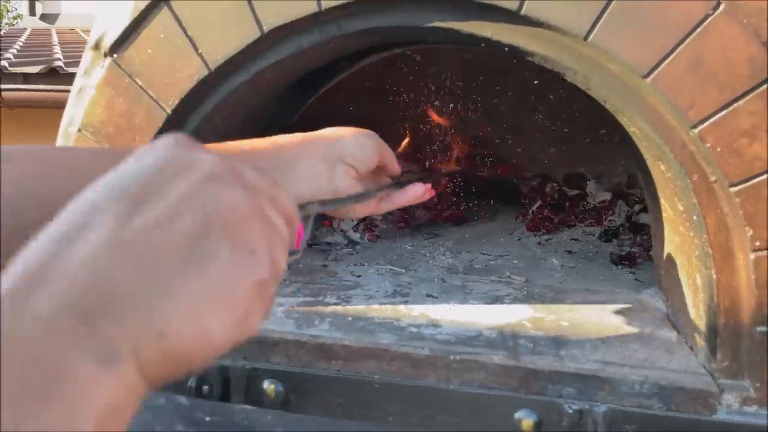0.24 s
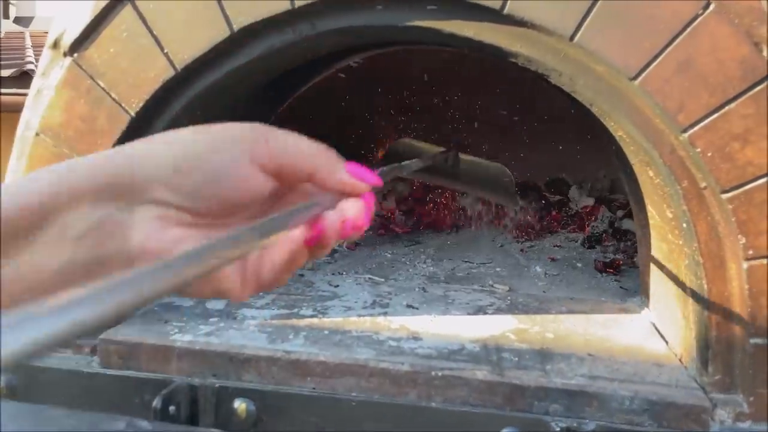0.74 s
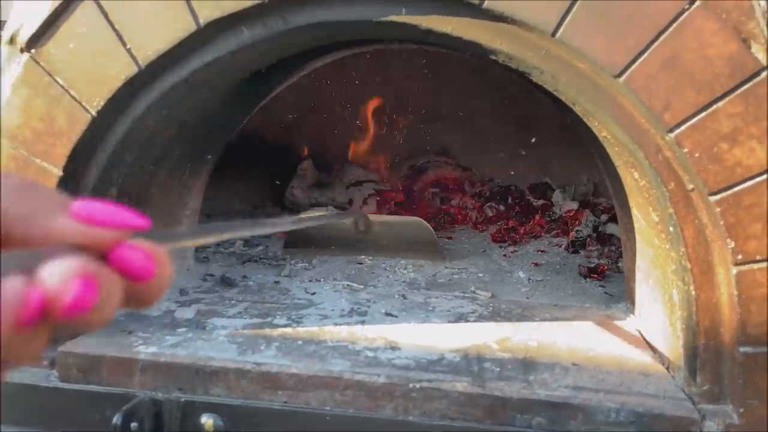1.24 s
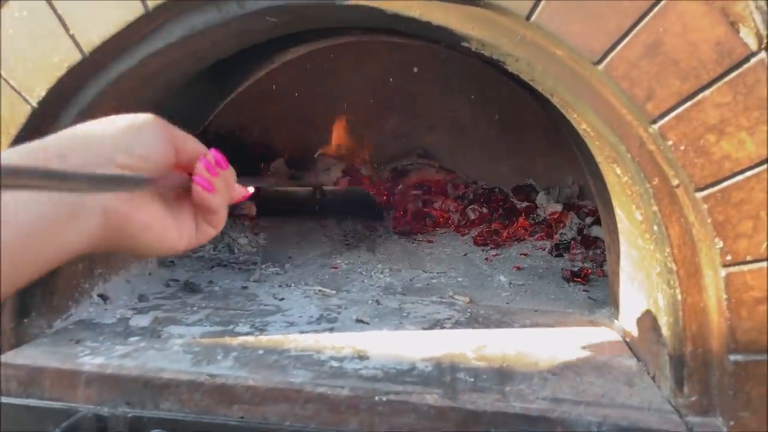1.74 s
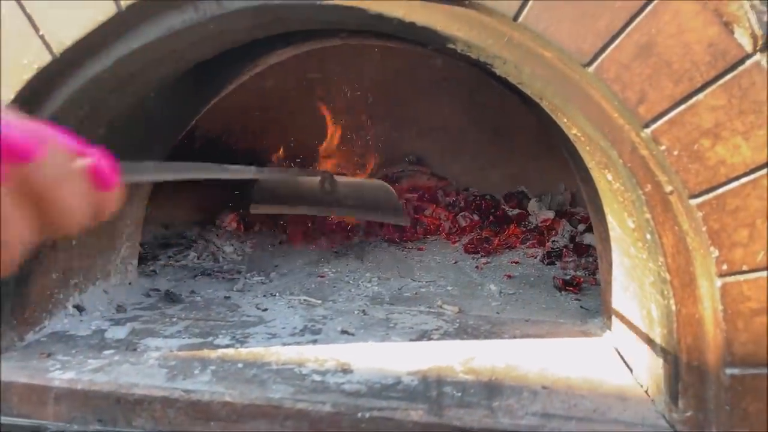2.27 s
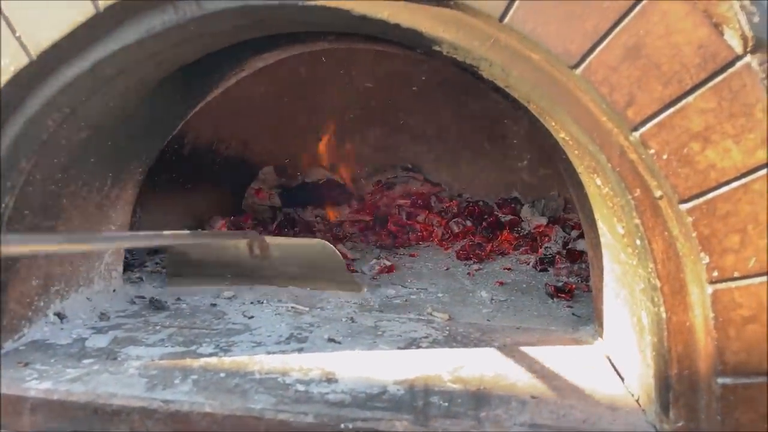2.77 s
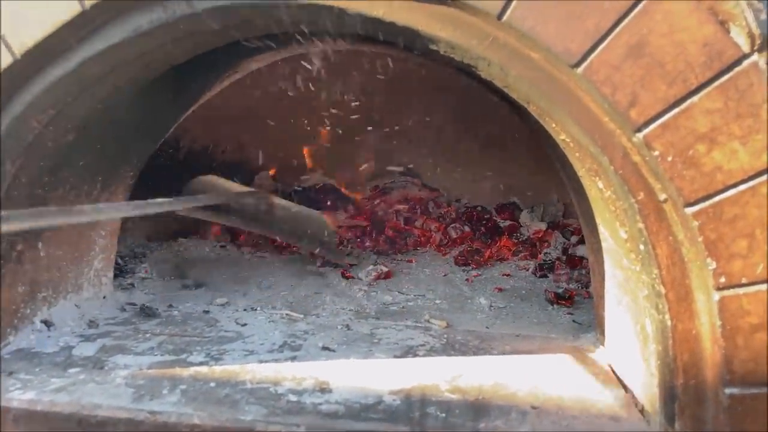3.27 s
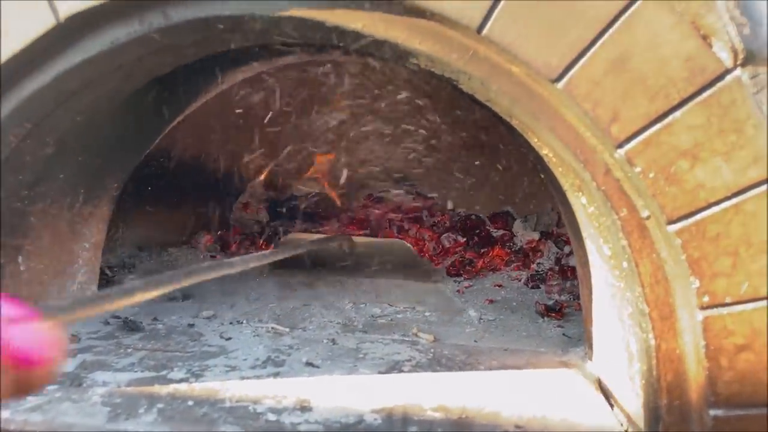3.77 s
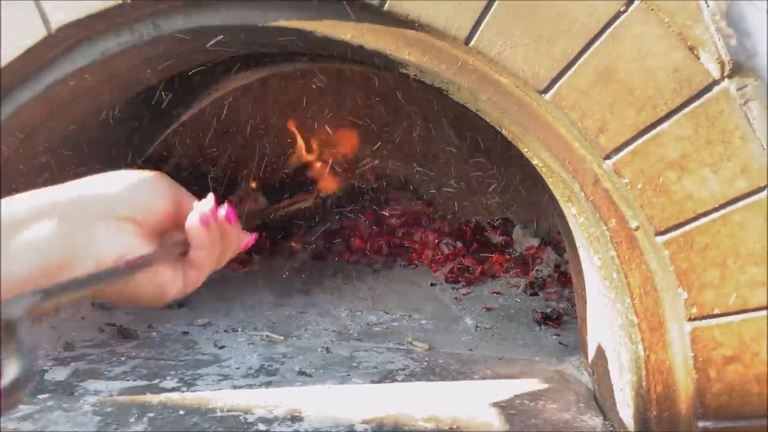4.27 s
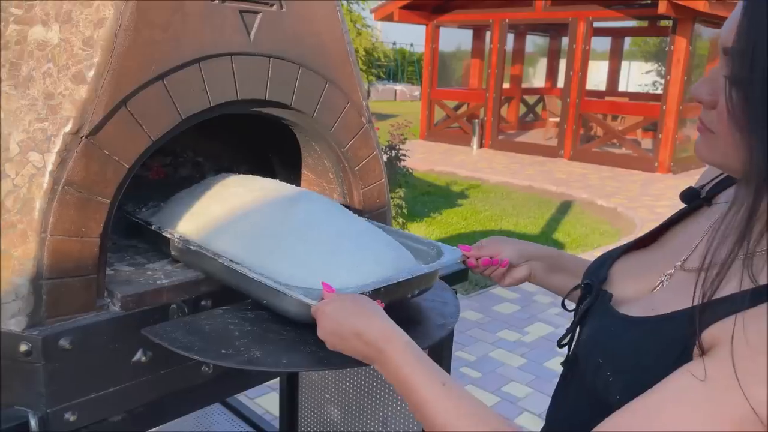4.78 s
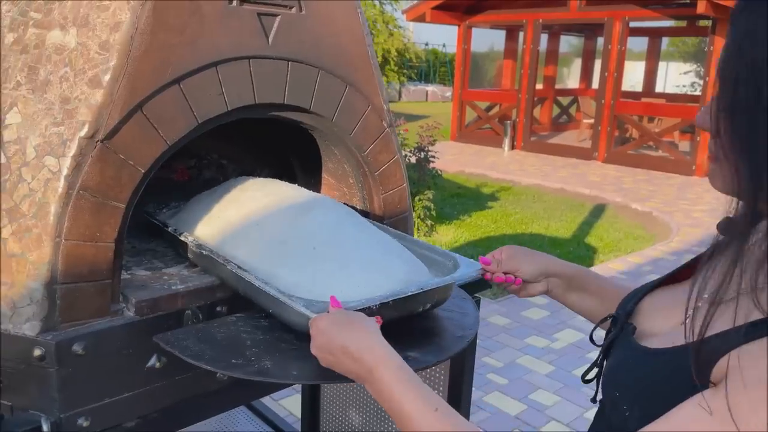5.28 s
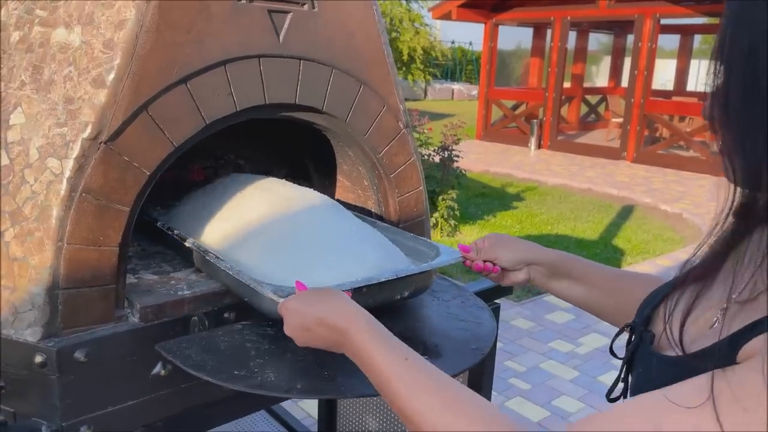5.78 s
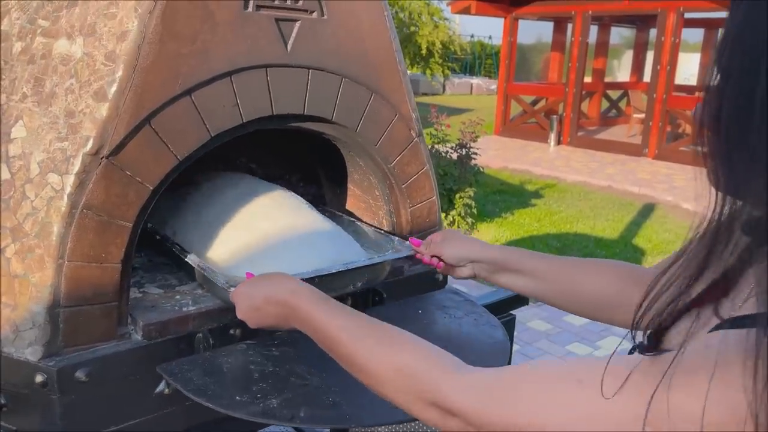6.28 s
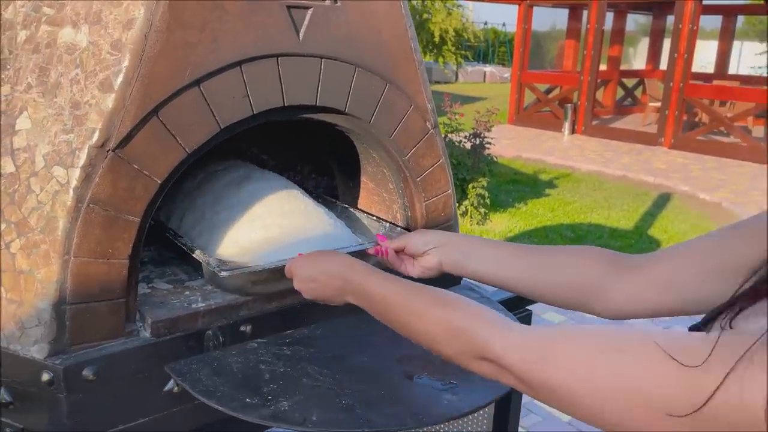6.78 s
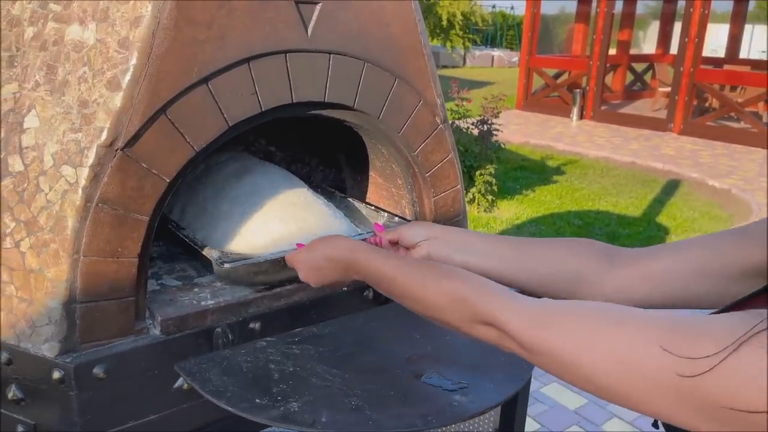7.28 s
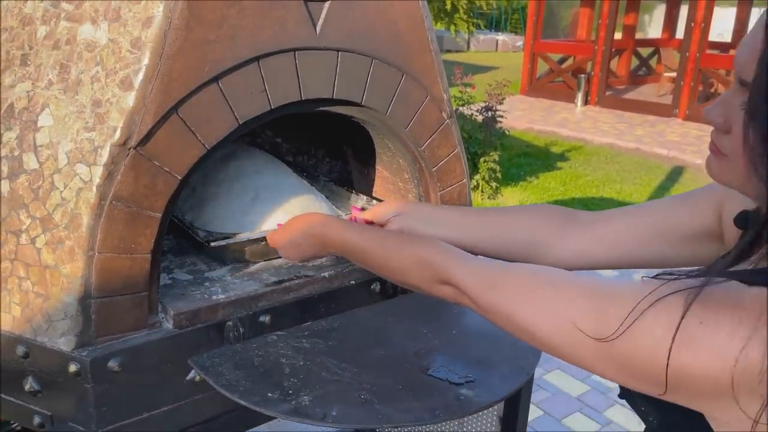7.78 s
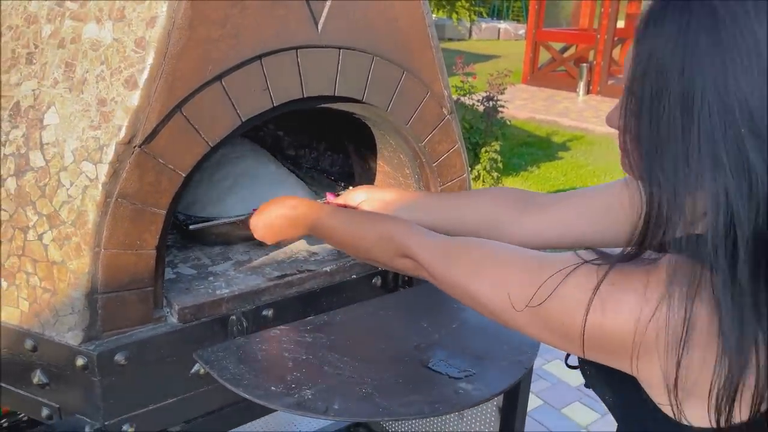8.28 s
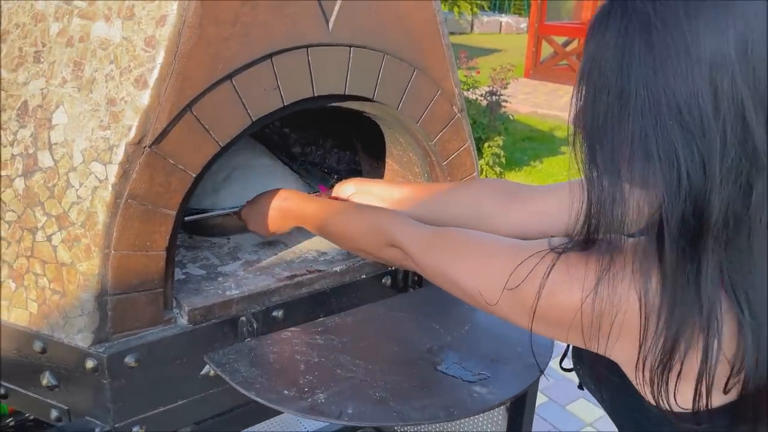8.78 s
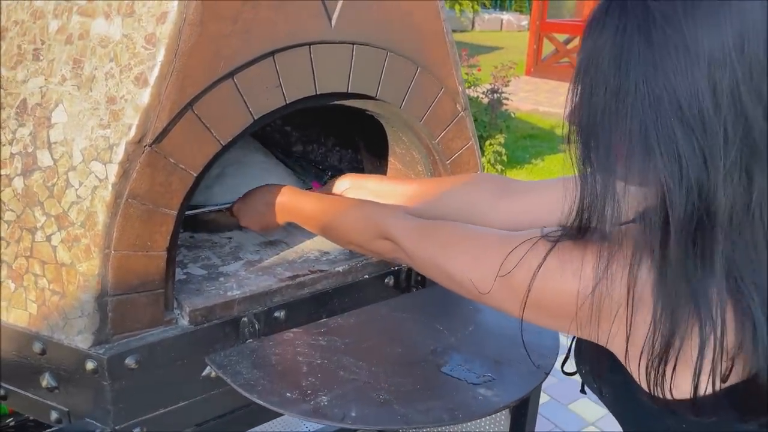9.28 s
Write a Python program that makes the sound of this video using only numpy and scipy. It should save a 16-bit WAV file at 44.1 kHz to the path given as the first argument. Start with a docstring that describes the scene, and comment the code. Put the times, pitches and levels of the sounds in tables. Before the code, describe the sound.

Raking first: bright metallic scrapes, sharp blade taps and brief squeals over stone, mixed with brittle coal clicks and crumbling, in uneven bursts with near-quiet gaps. Next, a heavy pan knocks on metal, its damped sheet ringing briefly, then slides with a rough growl up to a hard clack. After a short pause it scrapes on over sandy stone, crackling with crushed grit. Close, dry microphone, tiny brick-dome reflection, low oven hum and soft outdoor air.

```python
"""Ember rake and baking pan in a wood-fired oven

A long steel rake strikes and scrapes the stone floor: friction and blows drive its modes and charcoal clicks.
Then a loaded metal pan knocks on a steel shelf, ringing in damped sheet modes, slides over it and is pushed
across the gritty hearth as shaped friction noise with bursting grit. The brick dome adds a brief echo of
decaying noise, the cavity hums as noise through a low resonance, and a faint garden hush lies behind."""
import sys
import numpy as np
from scipy import signal
from scipy.fft import rfft, irfft, next_fast_len
from scipy.io import wavfile
from scipy.ndimage import uniform_filter1d, map_coordinates

SR = 44100
rng = np.random.default_rng(int(sys.argv[2]) if len(sys.argv) > 2 else 0)


def write(x):
    x = np.atleast_2d(x).T
    wavfile.write(sys.argv[1], SR, np.round(np.clip(x, -1, 1) * 32767).astype(np.int16))


N = 420273

# The blade hits stone. Each row: start in seconds, level in dB, chatter t60 in seconds, pitch that the
# contact favours in Hz, edge sizzle and floor thump in dB relative to the level.
BLADE_BLOWS = [(0.051, -23, 0.059, 1740, -19, -20), (0.109, -27, 0.12, 5440, -14, -37.5),
               (0.233, -18, 0.046, 1990, -8, -45), (1.258, -27.5, 0.18, 1480, -43, -62),
               (1.304, -22.5, 0.07, 1670, -20, -24), (1.371, -27.5, 0.026, 3400, -5, -46),
               (2.752, -26.5, 0.1, 3440, -30, -26.5), (2.774, -22, 0.09, 2380, -15, -28.5),
               (3.228, -68, 0.05, 700, -12, 12.5), (3.649, -16.5, 0.033, 3100, -11.5, -30),
               (3.657, -15, 0.097, 4100, -2.5, -19), (4.187, -31, 0.035, 3570, -12, -39),
               (4.398, -26.5, 0.049, 1720, -1, -31)]
# How hard the pan is pushed over the shelf, then the hearth.
# Each row: time in seconds, push in dB, level of the hiss in dB, both before the mix of the slide.
SHELF_PUSH = [(5.42, -65, -70), (5.528, -51.5, -69), (5.666, -58, -66), (5.738, -46.5, -66.5),
              (6.108, -40.5, -49), (6.336, -38.5, -48.5), (6.484, -34, -44), (6.54, -32, -42),
              (6.666, -42, -48.5), (6.78, -74.5, -82)]
HEARTH_PUSH = [(6.88, -65.5, -73), (6.96, -63, -85), (7.23, -53.5, -62), (7.39, -36.5, -44),
               (7.51, -37.5, -44), (8.27, -35.5, -44), (8.53, -38.5, -42.5), (8.71, -39.5, -45.5),
               (8.99, -40.5, -43.5), (9.15, -44.5, -44.5), (9.53, -40.5, -48)]


def amp(db):
    """Decibels to gain."""
    return np.exp(np.asarray(db) * (np.log(10) / 20))


def unit(x):
    """Scale to rms 1."""
    return x / np.sqrt(np.mean(x ** 2) + 1e-20)


def fade(t, t60):
    """Exponential decay by 60 dB in t60 seconds."""
    return np.exp(-np.log(1000) * t / t60)


def along(points, hz):
    """(Hz, value) points read on a log frequency axis."""
    f, v = np.transpose(points)
    return np.interp(np.log(hz + 1), np.log(f + 1), v)


def gains(rows):
    """One gain per sample for each dB column, practically silent outside the rows."""
    s, *columns = np.transpose(rows)
    t = np.arange(N) / SR
    return np.array([amp(np.interp(t, s, c, left=-120, right=-120)) for c in columns])


def wobble(rate):
    """A random curve of about rate knots a second, smoothed to 16 fine steps per knot."""
    fine = signal.resample_poly(rng.standard_normal(512), 16, 1)
    step = int(SR / (16 * rate)) + 1
    return np.repeat(fine[:int(N * 16 * rate / SR) + 2], step)[:N]


def filtered(x, response):
    """x times a response of frequency."""
    m = next_fast_len(N + SR // 4)
    return irfft(rfft(x, m) * response(np.fft.rfftfreq(m, 1 / SR)), m)[..., :N]


def coloured(x, spectrum):
    """x with a (Hz, dB) colour, at rms 1."""
    return unit(filtered(x, lambda hz: amp(along(spectrum, hz))))


def resonate(x, hz, t60):
    """One mode as a two-pole resonator that keeps the power of a white drive."""
    r = fade(1 / SR, t60)
    poles = [1, -2 * r * np.cos(2 * np.pi * hz / SR), r * r]
    return np.sqrt((1 - r * r) / 2) * signal.lfilter([1, 0, -1], poles, x)


def add(track, s, x):
    """Mix x into track at time s."""
    i = round(s * SR)
    track[i:i + len(x)] += x[:max(N - i, 0)]


def strokes(rows, swell_db, release_db_per_s):
    """One gain curve per row: it swells, sags (or grows) while held, then dies away."""
    t, curves = np.arange(N) / SR, []
    for s, attack, hold, db, sag, *_ in rows:
        since = t - s - attack
        to_go = np.maximum(-since / attack, 0)
        level = db - swell_db * to_go ** 2
        level -= sag * np.clip(since, 0, hold)
        level -= release_db_per_s * np.maximum(since - hold, 0)
        curves.append(amp(np.maximum(level, -150)) * (t >= s))
    return np.array(curves)


def friction(rate, spread_db, life, smooth):
    """Tiny fractures at random times and sizes, each a short noise burst, over an even rub."""
    hits = np.flatnonzero(rng.random(N) < rate / SR)
    size = amp(spread_db * np.minimum(rng.standard_exponential(N)[hits], 4))
    power = np.bincount(hits, size ** 2, N)
    bursts = signal.lfilter([1], [1, -fade(1 / SR, life) ** 2], power)
    return unit(rng.standard_normal(N) * np.sqrt(bursts / bursts.mean() + smooth))


def clicks(rows, t60, tail_db, ring_t60, snap_db, dull_hz, snap_t60):
    """Brittle breaks: a sharp snap, crumbling, and a brief ring at the fragment's own pitch."""
    out, t = np.zeros(N), np.arange(SR // 20) / SR
    snap_band = signal.butter(1, [400, dull_hz], "band", fs=SR)
    for s, db, hz in rows:
        burst = rng.standard_normal(len(t)) * (fade(t, snap_t60) + amp(tail_db) * fade(t, t60))
        click = resonate(burst, hz, ring_t60) + amp(snap_db) * signal.lfilter(*snap_band, burst)
        add(out, s, amp(db) * click / np.abs(click).max())
    return out


def rake():
    """Scraping and blows drive the steel's modes; the stone rasps along with them."""
    # The rake is dragged over the stone. Each row: start, attack and hold in seconds, level in dB,
    # sag in dB per second of the hold, blade flex and edge sizzle in dB relative to the level.
    drag_rows = [(0.0, 0.14, 0.054, -29.5, 9, -10.5, -9.5), (0.195, 0.023, 0.012, -20, -5, -17, -17),
                 (0.324, 0.061, 0.0088, -19.5, -3, -19, -17.5),
                 (1.372, 0.076, 0.12, -22.5, -7, -21.5, -14.5), (1.564, 0.078, 0.28, -27, 20.5, -21, -12),
                 (1.993, 0.092, 0.21, -41, 1.5, -26.5, -17), (2.836, 0.12, 0.13, -20, 19.5, -14.5, -13.5),
                 (3.675, .03, 0.069, -20.5, 101, -16, -28), (3.773, 0.07, 0.095, -22, -2, -17.5, -13.5),
                 (3.902, 0.086, 0.22, -21, 37, -33.5, -14), (4.219, 0.06, 0.62, -36, 25.5, -16, -9)]
    # Broad bending modes of the blade. Each row: pitch in Hz, level in dB within the family, t60 in seconds.
    flex_modes = [(519, 2.5, 0.17), (624, -8, 0.17), (680.4, 12, 0.05), (869.5, 5, 0.26), (898, 6, 0.037)]
    # Modes of the long shaft. Each row: pitch in Hz, level in dB within the family,
    # t60 in seconds before the floor damps it.
    shaft_modes = [(1475, -12, .25), (1593, -12, .06), (1660, -16, .3), (1935, -8, .1), (1962, -5, .4),
                   (2256, -5, .3), (2433, -14, .13), (2704, -10, .4), (3074, -8, .2), (3264, -8, .3),
                   (3580, -12, .15), (3639, -11, .2), (3876, -10, .3), (3926, -3.5, .6), (4215, -20, .15),
                   (4503, -11, .25), (4640, -13, .2), (4683, -11, .25), (4760, -9.5, .35), (5158, -10, .3),
                   (5315, -11, .2), (5560, -14, .2), (5706, -19, .25), (5932, -15, .15)]
    # High modes of the blade's edge. Each row: pitch in Hz, relative level in dB, t60 in seconds.
    edge_modes = [(6153, -6, .12), (6412, -6, .12), (6703, 0, .25), (7006, -1, .15), (7555, -3, .18),
                  (7695, -6, .15), (7825, -8, .12), (8000, -7, .14)]
    # Lightly damped modes that linger when the rake is lifted.
    # Each row: pitch in Hz, level in dB relative to the drive, t60 in seconds.
    linger_modes = [(716, -15, 2.5), (742, -20, 2.5), (1658, -20, 1.3), (1965, -21, .8), (2708, -23, .8)]
    # Colours of the stone's rasp and of the gritty edge. Each row: frequency in Hz, relative level in dB.
    stone_colour = [(60, -28), (200, -12.5), (450, -16.5), (750, -3.5), (1150, -21.5), (1700, 16.5),
                    (2800, 9), (3500, 12.5), (4200, 2), (5200, 5), (7000, -7), (11000, -21)]
    grit_colour = [(5000, -44), (7500, -7), (9000, 2), (11000, 0), (13000, -3.5), (16000, -10.5)]

    drags = strokes(drag_rows, swell_db=18, release_db_per_s=266)
    *_, flex_db, edge_db = np.transpose(drag_rows)
    flex, ring, sizzle = amp(flex_db) @ drags, drags.sum(axis=0), amp(edge_db) @ drags
    blows, thumps, t = np.zeros(N), np.zeros(N), np.arange(SR // 4) / SR
    for s, db, t60, _, sizzle_db, thump_db in BLADE_BLOWS:
        add(blows, s, amp(db) * fade(t, t60))
        add(sizzle, s, amp(db + sizzle_db) * fade(t, t60))
        add(thumps, s, amp(db + thump_db) * fade(t, 0.2))

    slips = friction(rate=450, spread_db=4.0, life=0.016, smooth=0.063)
    chatter = rng.standard_normal((len(BLADE_BLOWS), len(t)))
    blade = steel(flex_modes, amp(1.5) * flex * slips, amp(-6.0) * chatter, damping=1.0, focus_db=7)
    shaft = steel(shaft_modes, amp(-5) * ring * slips, amp(-2) * chatter, damping=2.5, focus_db=14)

    edge = sum(amp(db - 9) * resonate(sizzle * slips * contact(), hz, t60) for hz, db, t60 in edge_modes)
    # still higher, the modes crowd together at random spacings
    crowd = np.zeros(N)
    for hz in np.linspace(8300, 15800, 44) + rng.uniform(-90, 90, 44):
        strength = rng.choice([-1, 1]) * rng.lognormal(0, .3)
        crowd += strength * resonate(slips * contact(), hz, .1)
    edge += amp(-9.5) * sizzle * coloured(crowd, grit_colour)

    linger_drive = (flex + amp(-23.5) * blows) * slips
    linger = sum(amp(db) * resonate(linger_drive, hz, t60) for hz, db, t60 in linger_modes)
    fractures = friction(rate=640, spread_db=2.0, life=0.00057, smooth=0.19)
    rasp = (amp(-18.5) * ring + amp(-4.5) * blows) * coloured(fractures, stone_colour)
    thud_colour = [(25, -13.5), (90, -5.0), (300, -0.5), (700, -13), (2000, -35.0)]
    thud = thumps * coloured(rng.standard_normal(N), thud_colour)
    return shaft + bend(blade + edge) + linger + thud + rasp + dome(rasp)


def steel(modes, drag, chatter, damping, focus_db):
    """Modes driven by dragging and by blows; the touch of the floor shortens them by the damping factor."""
    out, t = np.zeros(N), np.arange(SR // 4) / SR
    for hz, db, t60 in modes:
        force = drag * contact()
        for (s, blow_db, blow_t60, spot_hz, _, _), noise in zip(BLADE_BLOWS, chatter):
            favour_db = focus_db * np.exp(-(np.log(hz / spot_hz) / 0.18) ** 2)
            add(force, s, amp(blow_db + favour_db) * fade(t, blow_t60) * noise)
        out += amp(db) * resonate(force, hz, t60 / damping)
    # each family of modes radiates little outside its own range
    own_range = [.8 * modes[0][0], 1.15 * modes[-1][0]]
    out = signal.lfilter(*signal.butter(4, own_range, "band", fs=SR), out)
    return out / np.linalg.norm([amp(db) for _, db, _ in modes])


def contact():
    """How well the wandering contact point couples to one mode: near a node it hardly does."""
    return unit(amp(7 * np.tanh(wobble(13))))


def bend(x):
    """The changing load on the rake detunes the modes slightly, as a wandering delay."""
    depth_s, bends_per_s = 0.00017, 7
    delay = depth_s * SR * uniform_filter1d(wobble(bends_per_s), size=1500)
    return map_coordinates(x, [np.arange(N) + delay])


def squeaks():
    """A metal edge catches on grit and sings briefly at an unsteady pitch."""
    # Each row: start in seconds, peak in dB before the mix, pitch in Hz,
    # length in seconds (the swell peaks a quarter of the way in).
    squeak_rows = [(0.013, -39.5, 7000, 0.033), (0.138, -30, 5350, 0.039), (0.377, -28, 1963, 0.07),
                   (2.569, -34, 3990, .014), (2.768, -26, 5200, 0.05), (3.075, -28, 4560, 0.031),
                   (3.662, -25, 3910, 0.14), (3.803, -26.5, 1962, 0.11), (3.956, -30, 3928, 0.16),
                   (4.03, -29, 1970, 0.23), (4.186, -23, 3680, 0.0091), (6.322, -25.5, 7300, 0.002),
                   (6.922, -54, 793, 0.035)]
    out, t = np.zeros(N), np.arange(SR // 5) / SR
    for s, db, hz, length in squeak_rows:
        pitch = hz * (1 + 0.0027 * wobble(300)[:len(t)])
        swell = 4 * t / length * np.exp(1 - 4 * t / length)
        add(out, s, amp(db) * swell * np.sin(2 * np.pi * np.cumsum(pitch) / SR))
    return amp(6.0) * out + amp(-5) * dome(out)


def embers(shove):
    """Charcoal crunches as many small fractures when it is pushed about, with a few sharper clicks."""
    # Single coals click and crack. Each row: start in seconds, peak in dB before the mix, pitch in Hz.
    coal_rows = [(0.5162, -19.5, 2200), (0.6434, -26.5, 2010), (0.714, -18, 2350), (0.7906, -28.5, 3240),
                 (0.8674, -20.5, 5300), (0.8868, -17, 5760), (0.9634, -32, 3850), (1.052, -28, 4760),
                 (1.923, -20, 2250), (2.2537, -28.5, 1780), (2.4603, -24, 3140), (2.5724, -13.5, 4270),
                 (2.63, -29.5, 2580), (3.3868, -35, 4140), (4.2727, -29.5, 4630), (4.3994, -8.5, 2130)]
    # Colour of the crunching heap. Each row: frequency in Hz, relative level in dB.
    charcoal_colour = [(100, -8), (250, -5.5), (450, 4.5), (750, 2), (1100, 1.5), (2000, 5), (3500, 0),
                       (5500, -2.5), (9000, -10.5), (16000, -18)]
    crumbs = friction(rate=450, spread_db=5.5, life=.005, smooth=.3)
    heap = amp(-4) * shove * coloured(crumbs, charcoal_colour)
    coals = amp(-4.5) * clicks(coal_rows, t60=0.035, tail_db=1.0, ring_t60=0.0047,
                               snap_db=2.5, dull_hz=8900, snap_t60=0.0032)
    return heap + coals + amp(-6.0) * dome(heap + coals)


def pan_knocks():
    """The pan's base bumps down: a clack, a dull thud of the load, then damped sheet-metal modes."""
    # Each row: start in seconds, level in dB, brightness of the clack in Hz,
    # ring and thud in dB relative to the level (the ring before its trim).
    knock_rows = [(4.7845, -19.5, 1900, 1, -33), (5.0707, -4, 2800, 1, -25), (5.2412, -26.5, 1560, 4, -14),
                  (5.29, -38, 2470, -11, -23), (5.517, -17.5, 4430, -6, -42),
                  (5.6692, -20.5, 3260, -2, -38), (6.561, -5.5, 5050, -42, -54),
                  (6.952, -32, 1280, -17, -28), (7.074, -32.5, 1300, 2, -21), (7.0323, -29, 2140, -8, -2),
                  (7.1391, -22, 3470, -20, -15.5)]
    # Modes of the loaded pan. Each row: pitch in Hz, relative level in dB, t60 in seconds.
    pan_modes = [(153, -16.5, 0.29), (219, -10.5, 0.14), (297, -7.5, 0.13), (379, -1, 0.086),
                 (426, -9, 0.28), (520, -13, 0.28), (605, -14, 0.21), (697, -10.5, 0.3), (930, -12, 0.19),
                 (1060, -11, 0.17), (1430, -17, .08), (1760, -13, .1), (2370, -21, 0.13)]
    out, t = np.zeros(N), np.arange(SR // 2) / SR
    for s, db, bright_hz, ring_db, thud_db in knock_rows:
        burst = rng.standard_normal(len(t)) * (fade(t, 0.02) + amp(-15) * fade(t, 0.12))
        clack = signal.lfilter(*signal.butter(2, [90, bright_hz], "band", fs=SR), burst)
        clack += amp(-19.5) * burst * fade(t, 0.0028)
        ring = np.zeros(len(t))
        for hz, level, t60 in pan_modes:
            strength = rng.choice([-1, 1]) * amp(level + rng.normal(0, 1.2))
            ring += strength * np.sin(2 * np.pi * hz * t) * fade(t, t60)
        thud = np.sin(2 * np.pi * 170 * t) * fade(t, 0.048)
        knock = amp(-3) * clack / np.abs(clack).max() + amp(ring_db - 15.0) * ring + amp(thud_db) * thud
        add(out, s, amp(db) * knock)
    return out


def pan_slides(on_shelf, on_hearth):
    """The pan slides over the shelf, then the hearth, crushing grit on its way."""
    # Colours of the pan on either surface. Each row: frequency in Hz, relative level in dB.
    shelf_colour = [(71, -55), (120, -20), (222, -20.5), (334, -2), (385, -10), (427, -1.5), (535, -9.5),
                    (617, -0.5), (911, -17.5), (1340, -10.5), (2240, -10.5), (3740, -11), (6110, -11),
                    (9400, -19), (16000, -36)]
    hearth_colour = [(120, -11.5), (220, -4.5), (430, 6.5), (700, 2), (930, -2.5), (1450, 4), (2500, 4.5),
                     (3600, -3), (5200, 5.5), (6800, -4.5), (7900, -5.5), (11000, -17), (16000, -21.5)]
    # The largest bits of grit burst under the pan.
    # Each row: start in seconds, peak in dB before the mix, pitch in Hz.
    crack_rows = [(5.795, -20.5, 4500), (5.945, -20.5, 1310), (6.07, -16, 3330), (6.186, -19, 1240),
                  (6.32, -23.5, 7350), (6.348, -15, 1400), (6.353, -11, 3270), (6.365, -12, 4310),
                  (6.451, -14, 1720), (6.619, -13.5, 4300), (6.678, -17.5, 3850), (6.971, -32, 3930),
                  (7.196, -26, 6070), (7.221, -28, 6660), (7.27, -22.5, 4200), (7.333, -14, 4600),
                  (8.007, -11.5, 1620), (8.034, -11.5, 1520), (8.17, -11.5, 2900), (8.35, -13, 2320),
                  (8.376, -14, 2380), (8.582, -14.5, 2410), (8.862, -5.5, 1630), (9.049, -16.5, 5370),
                  (9.069, -15, 1400), (9.077, -16, 5530), (9.102, -6.5, 5500), (9.244, -15, 1660),
                  (9.31, -12, 1290), (9.402, -20.5, 900)]
    shelf_grains = friction(rate=500, spread_db=5.0, life=0.017, smooth=1.0)
    shelf = slide(*on_shelf, shelf_colour, shelf_grains,
                  surge_db=0.8, body_db=-2, rasp_db=-1.0, hiss_db=-1.5)
    hearth_grains = friction(rate=370, spread_db=4.5, life=0.014, smooth=0.9)
    hearth = slide(*on_hearth, hearth_colour, hearth_grains,
                   surge_db=0.9, body_db=-8.0, rasp_db=0.0, hiss_db=-2)
    bursts = crack_rows + small_bits(on_shelf[0] + on_hearth[0])
    cracks = amp(-0.5) * clicks(bursts, t60=0.03, tail_db=-5.5, ring_t60=0.0026,
                                snap_db=5.5, dull_hz=4770, snap_t60=0.0023)
    return shelf + hearth + cracks + amp(-8) * dome(cracks)


def slide(push, hiss_gain, colour, grains, surge_db, body_db, rasp_db, hiss_db):
    """In uneven surges the pan's body rumbles and its base rasps with the push, and fine grit hisses."""
    sound = coloured(grains, colour) * amp(surge_db * wobble(22))

    def low(hz, edge):
        """Smooth low-pass response."""
        return 1 / (1 + (hz / edge) ** 6)

    def split(hz):
        """Responses of the body, rasp and hiss bands."""
        return np.array([low(hz, 1340), low(hz, 5200) - low(hz, 780), 1 - low(hz, 7600)])

    body, rasp, hiss = [unit(band * amp(surge_db * wobble(17))) for band in filtered(sound, split)]
    return push * (amp(body_db) * body + amp(rasp_db) * rasp) + amp(hiss_db) * hiss_gain * hiss


def small_bits(push):
    """Random bursts of grit, (s, dB, pitch Hz), as strong as the push that crushes them."""
    bits_per_s, over_push_db, spread_db = 8.1, 16.5, -1
    typical_hz, spread_octaves = 2390, .6
    start, end = SHELF_PUSH[0][0], HEARTH_PUSH[-1][0]
    bits = []
    for i, (jitter, size, pitch) in enumerate(rng.standard_normal((100, 3))):
        s = start + (i + .5 * jitter) / bits_per_s
        if start < s < end:
            db = 20 * np.log10(push[int(s * SR)]) + over_push_db + spread_db * size
            bits.append((s, db, typical_hz * 2 ** np.clip(spread_octaves * pitch, -1, 1)))
    return bits


def dome(x):
    """Echo of the brick vault: a noise tail of unit energy, 2.5 ms late, whose highs die first."""
    # Decay of the vault. Each row: frequency in Hz, t60 in seconds.
    vault_decay = [(150, 0.15), (700, 0.07), (3000, 0.035), (12000, 0.013)]
    hz, t, z = signal.stft(rng.standard_normal(SR // 3), SR, nperseg=256)
    tail = signal.istft(z * fade(t, along(vault_decay, hz)[:, None]), SR, nperseg=256)[1]
    return signal.fftconvolve(x, np.pad(tail, (SR // 400, 0)) / np.linalg.norm(tail))[:N]


def air(shove, push):
    """Whatever moves in the oven stirs a hum at its mouth resonance, over a faint outdoor hush."""
    # Now and then the hum swells. Each row: start, attack and hold in seconds, level in dB,
    # sag in dB per second of the hold.
    boom_rows = [(0.02, 0.037, .27, -49.5, 30), (3.21, .025, 0.014, -57, -7.5),
                 (6.28, 0.094, .27, -45.5, 23), (7.9, .12, 0.073, -46, 0)]
    # Colour of the outdoor hush. Each row: frequency in Hz, relative level in dB.
    garden_colour = [(25, -7), (80, 5.5), (160, 1), (600, -1.5), (1200, -10), (4000, -13), (10000, -19),
                     (16000, -17.5)]
    booms = strokes(boom_rows, swell_db=26, release_db_per_s=204).sum(axis=0)
    # a resting hum, then shares stirred by the heap and by the pan
    stir = amp(-71.5) + amp(-21) * shove + amp(-17) * push + booms
    cavity = resonate(resonate(rng.standard_normal(N), 80, .16), 80, .07)
    hum = stir * unit(amp(2 * wobble(8)) * cavity)
    # a faint outdoor hush, louder from 4.7 s
    hush_db = np.where(np.arange(N) / SR < 4.7, -65.5, -60)
    return hum + amp(hush_db) * coloured(rng.standard_normal(N), garden_colour)


def scene():
    """Rake and coals first, then the pan, over the air of oven and garden."""
    # The blade shoves the charcoal heap. Each row: start, attack and hold in seconds,
    # level in dB before the mix, sag in dB per second of the hold.
    shove_rows = [(0.0, 0.035, 0.3, -28.5, 21.5), (0.45, 0.13, 0.46, -42.5, 17.5),
                  (1.3, 0.41, 0.25, -39, -24), (2.05, 0.093, 0.037, -48, 3), (2.44, 0.056, 0.11, -54, -6),
                  (2.85, 0.11, 0.15, -55, 18), (3.75, 0.47, 0.3, -41, -13.5),
                  (4.55, 0.25, 0.32, -44.5, 18.5)]
    # the release is the heap settling
    shove = strokes(shove_rows, swell_db=8.5, release_db_per_s=179.5).sum(axis=0)
    on_shelf, on_hearth = gains(SHELF_PUSH), gains(HEARTH_PUSH)
    raking = rake() + squeaks() + embers(shove)
    pan = pan_knocks() + pan_slides(on_shelf, on_hearth)
    return (raking + pan + air(shove, on_shelf[0] + on_hearth[0]))[None]


def record(dry):
    """A steep band limit: nothing remains above 15.8 kHz."""
    return filtered(dry, lambda hz: hz < 15800)


dry = scene()
out = record(dry)
write(out)
```